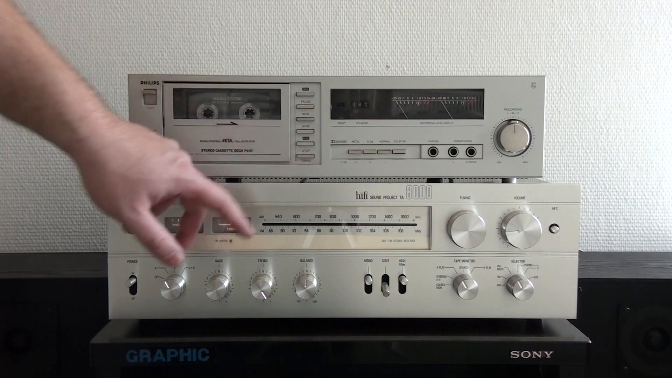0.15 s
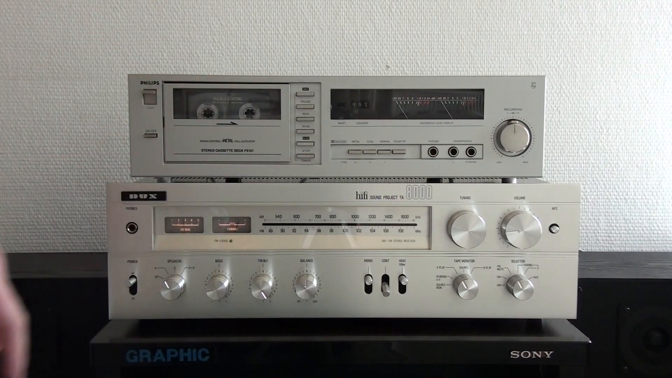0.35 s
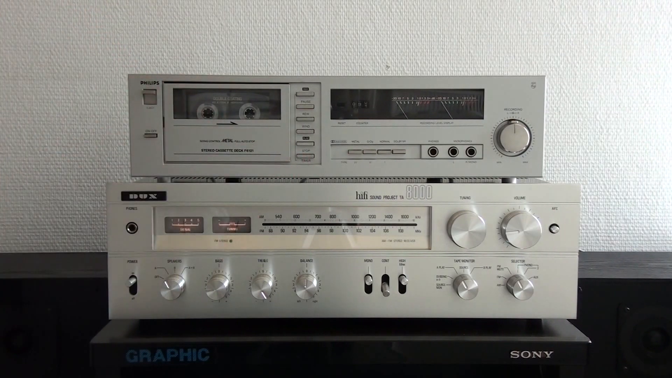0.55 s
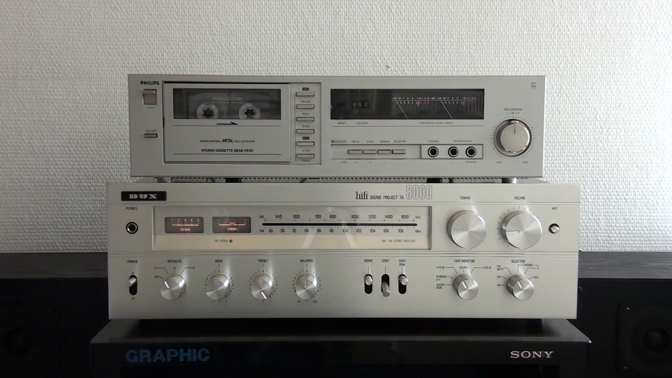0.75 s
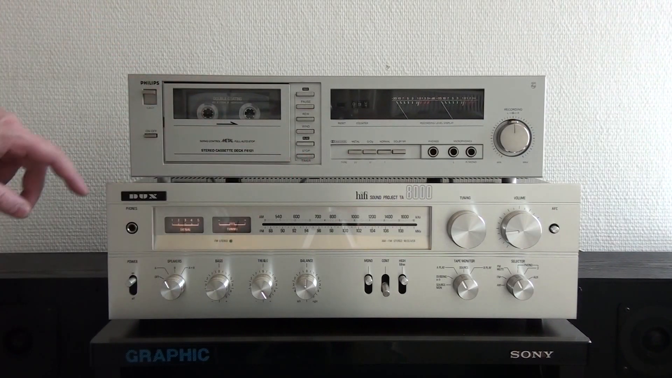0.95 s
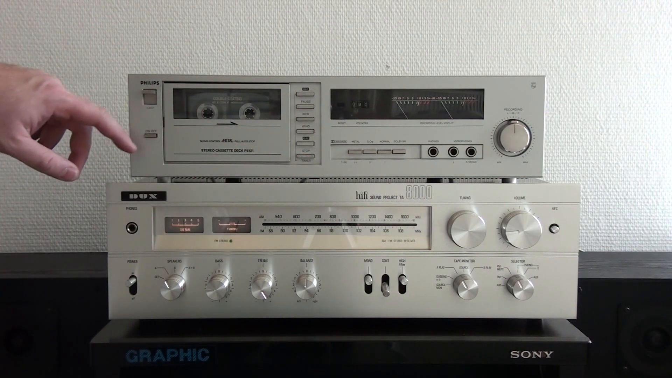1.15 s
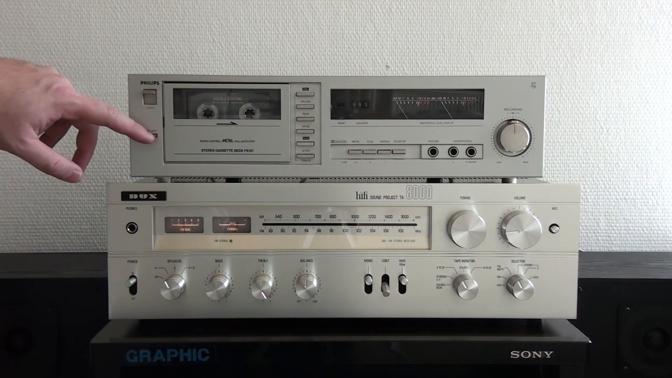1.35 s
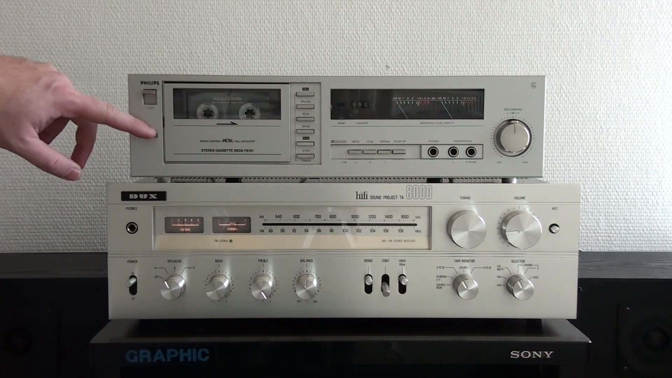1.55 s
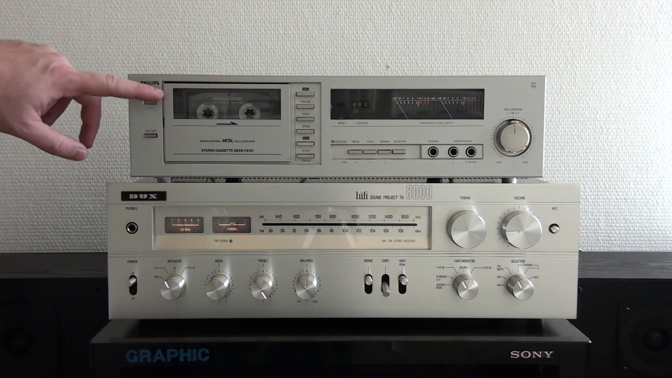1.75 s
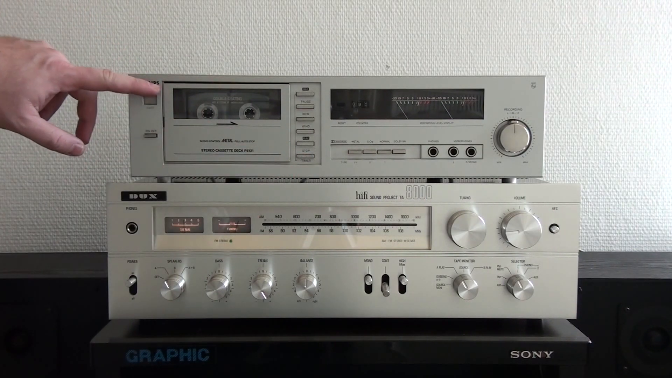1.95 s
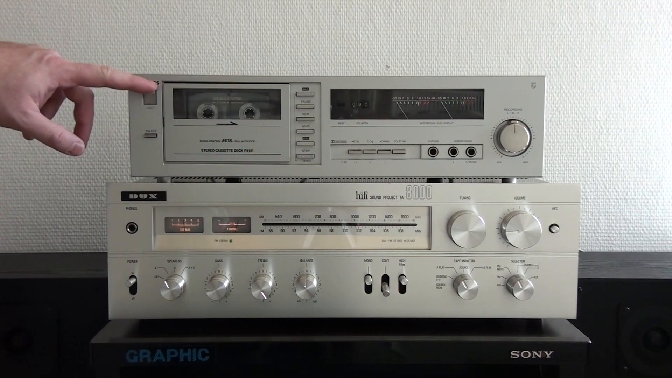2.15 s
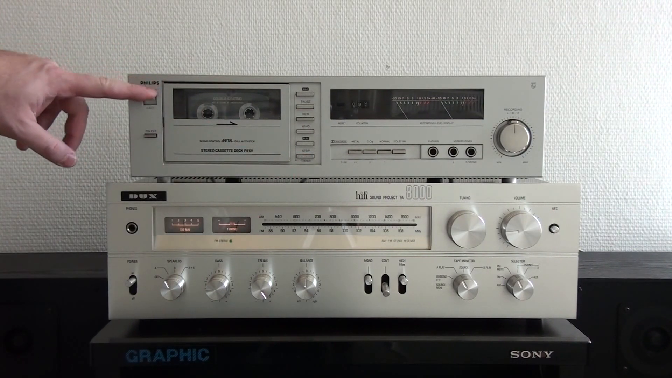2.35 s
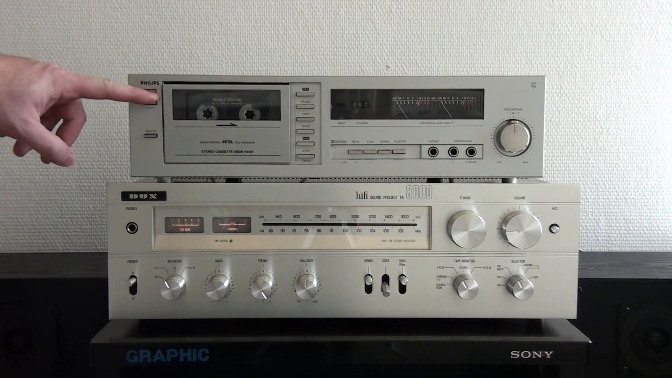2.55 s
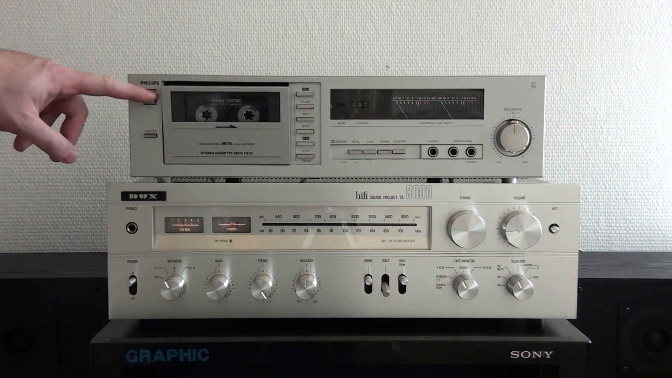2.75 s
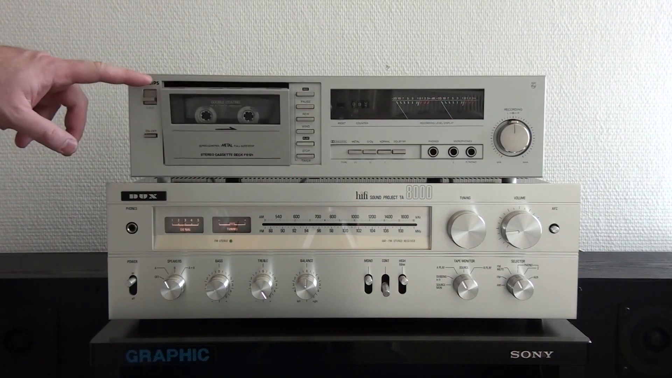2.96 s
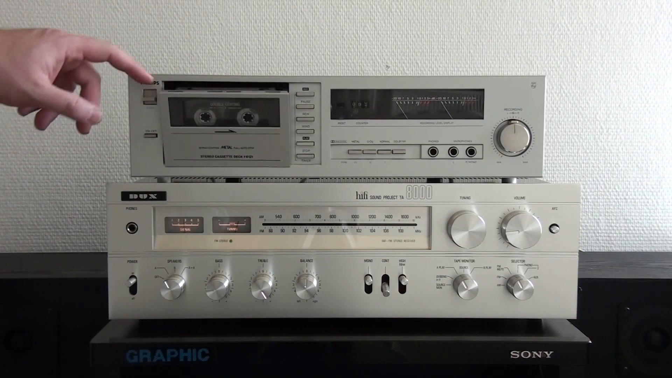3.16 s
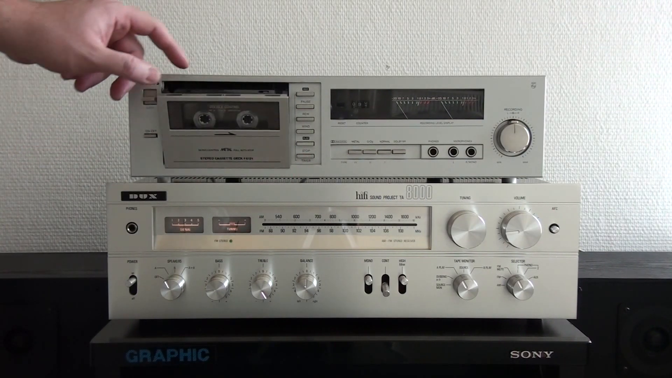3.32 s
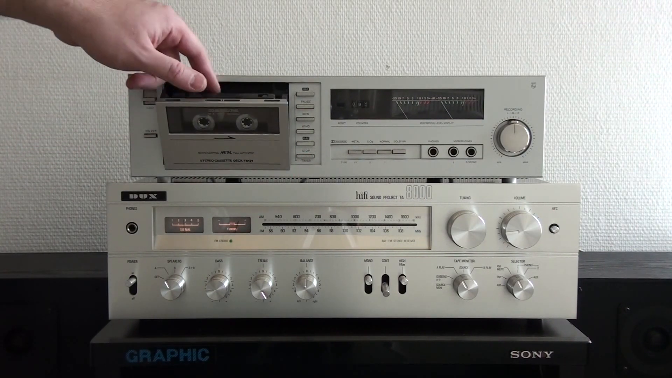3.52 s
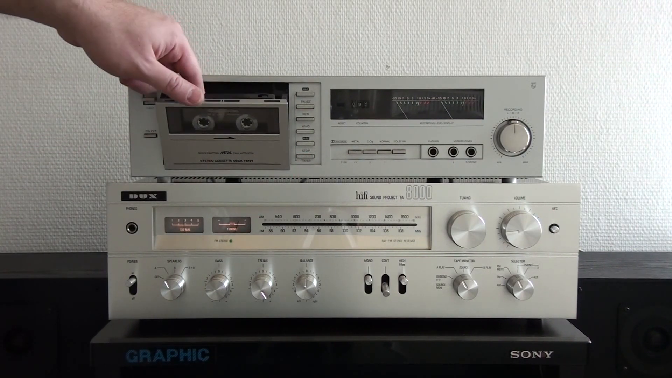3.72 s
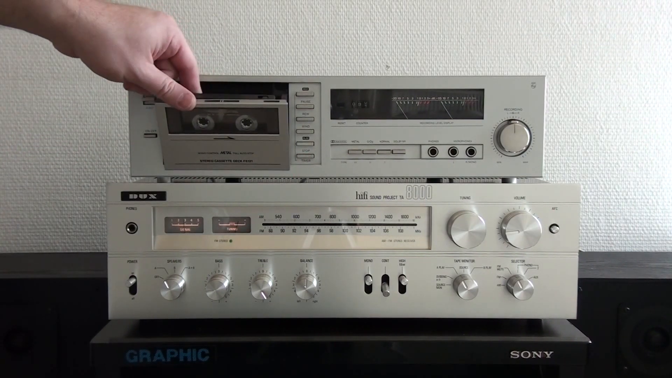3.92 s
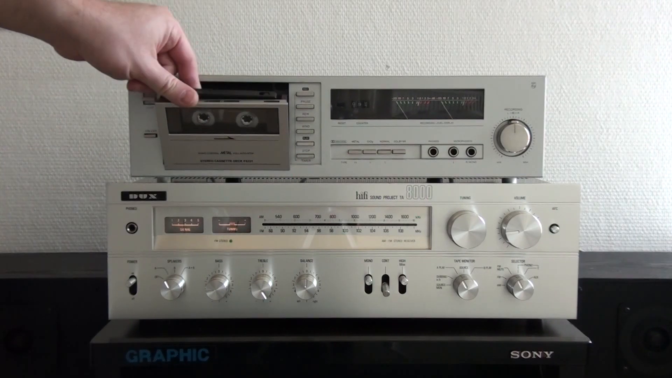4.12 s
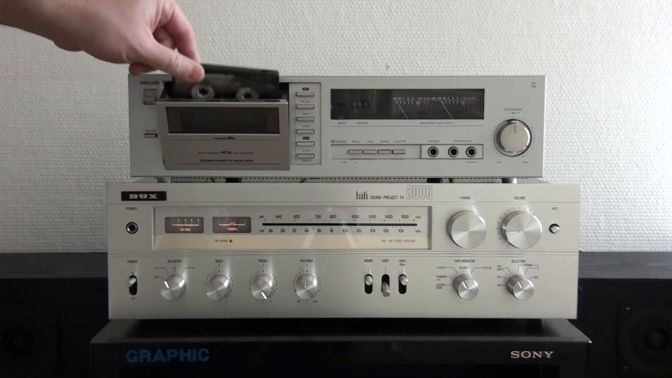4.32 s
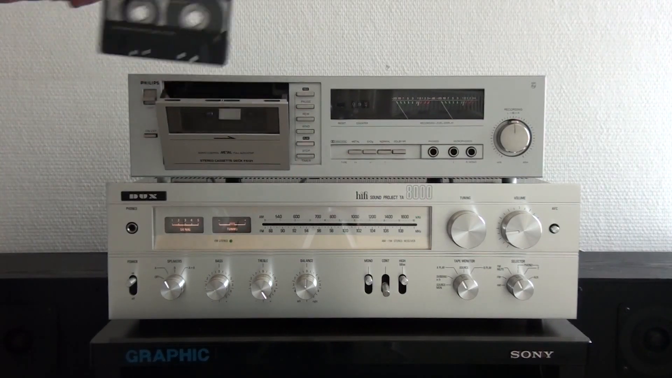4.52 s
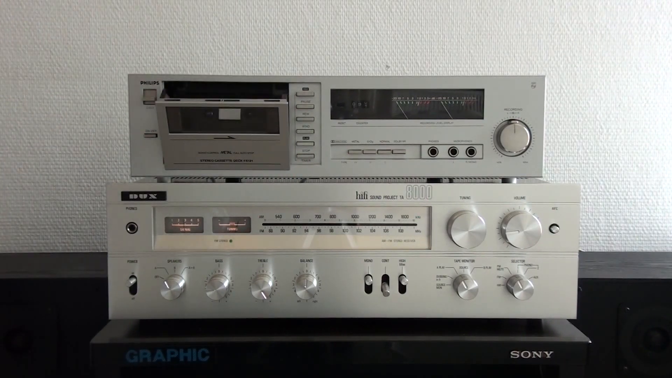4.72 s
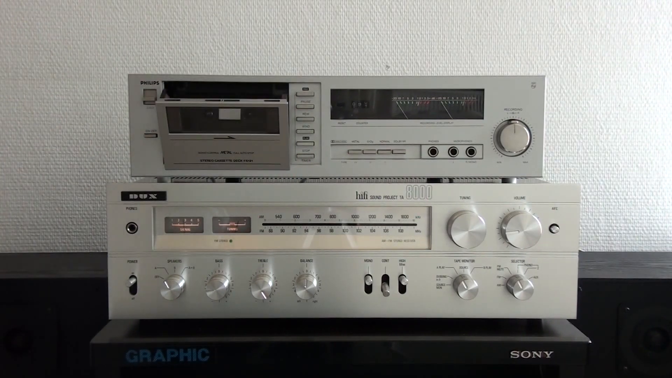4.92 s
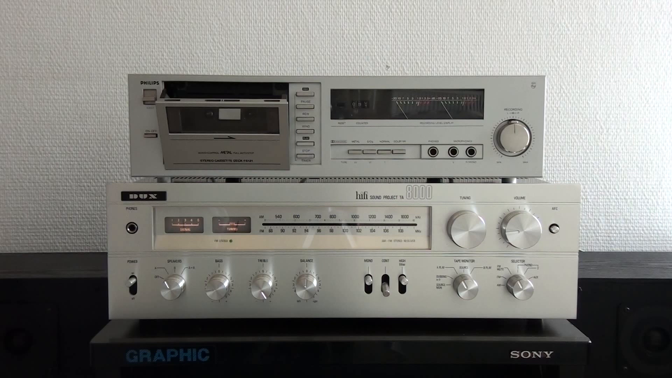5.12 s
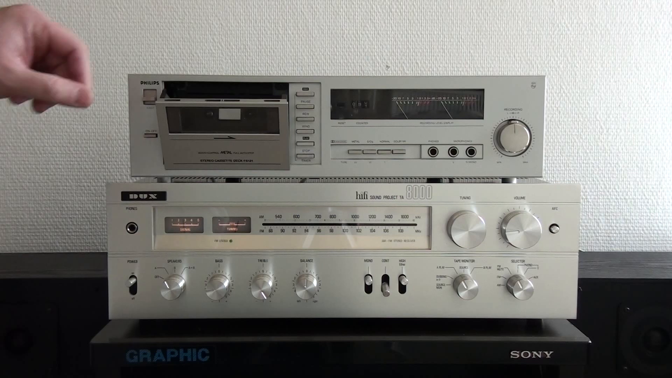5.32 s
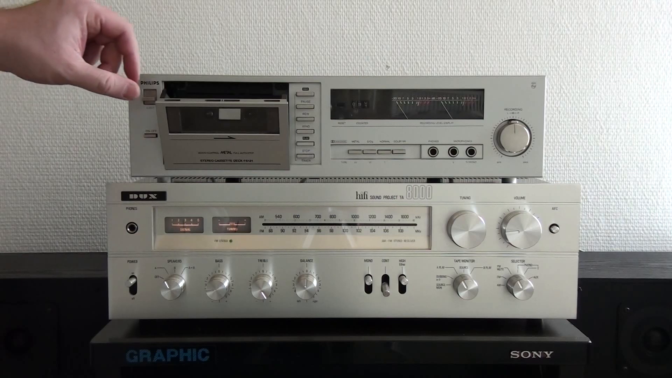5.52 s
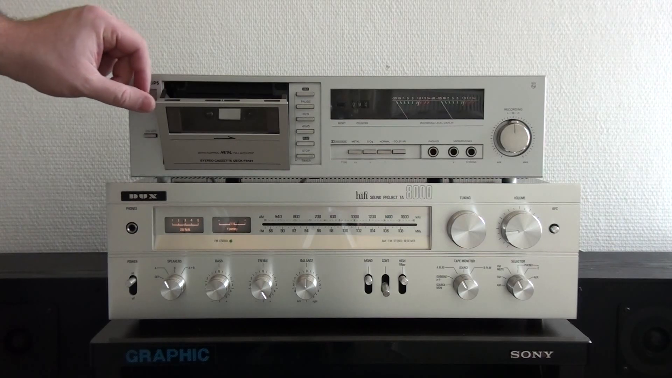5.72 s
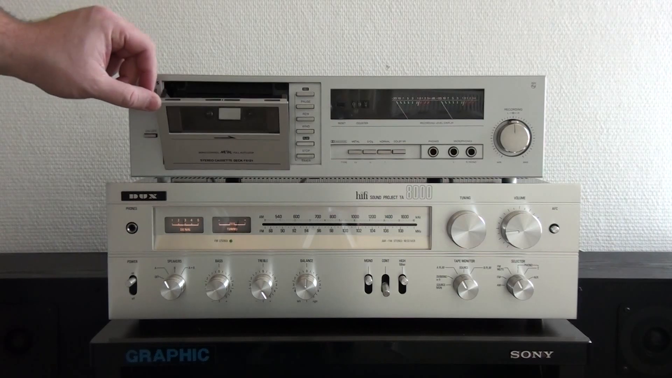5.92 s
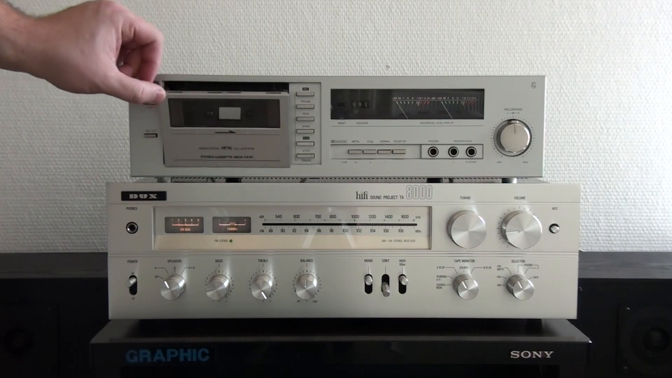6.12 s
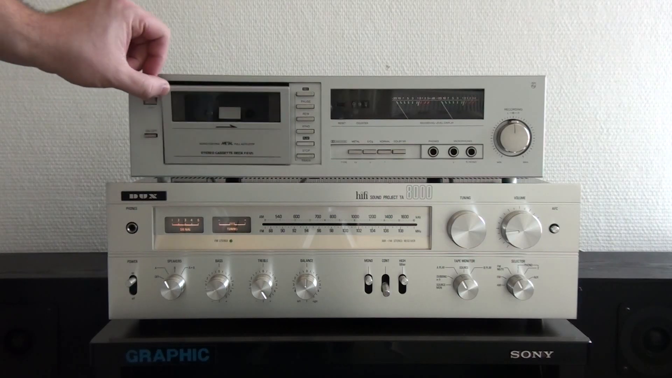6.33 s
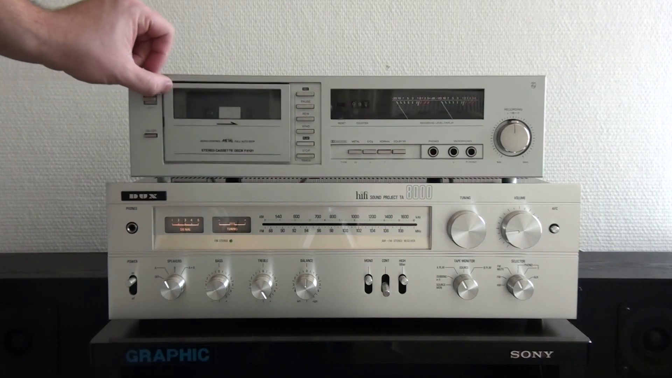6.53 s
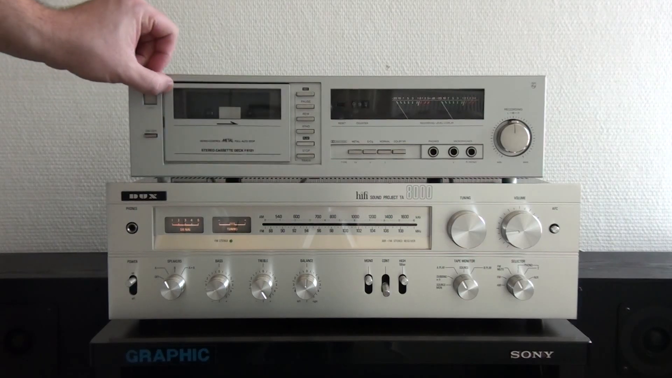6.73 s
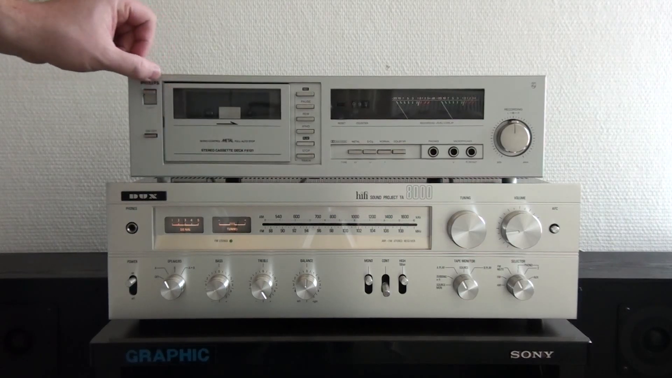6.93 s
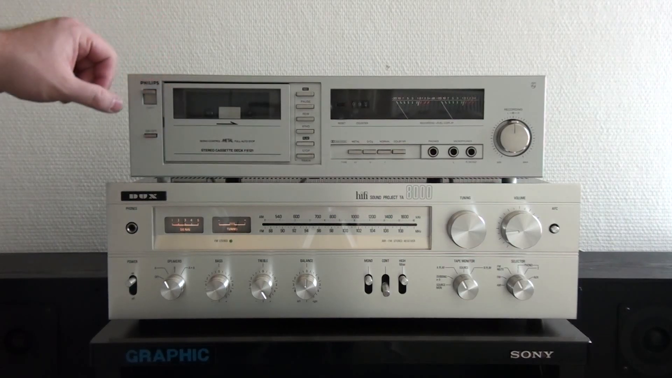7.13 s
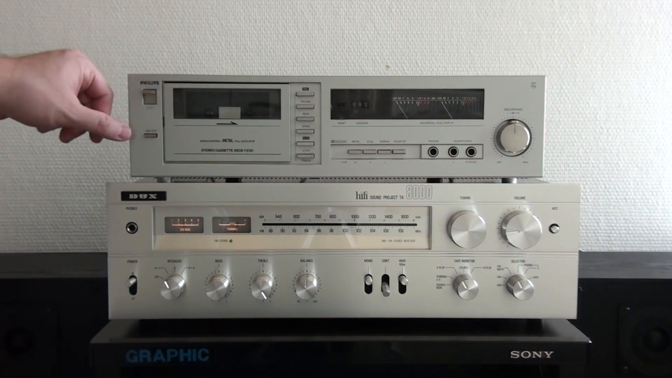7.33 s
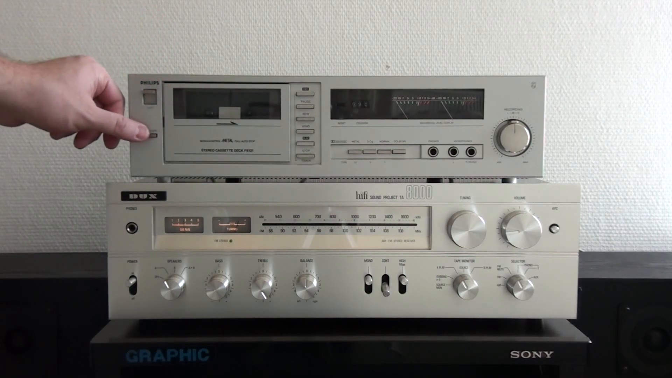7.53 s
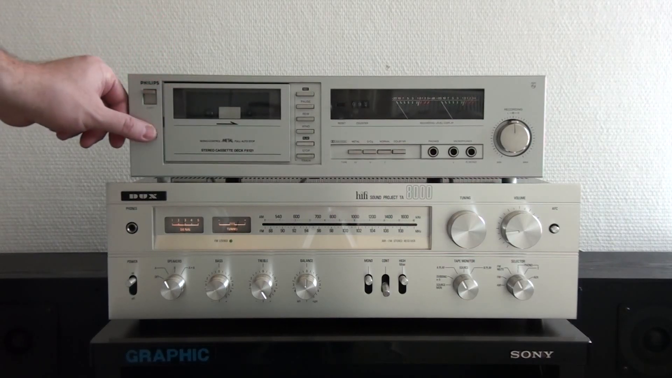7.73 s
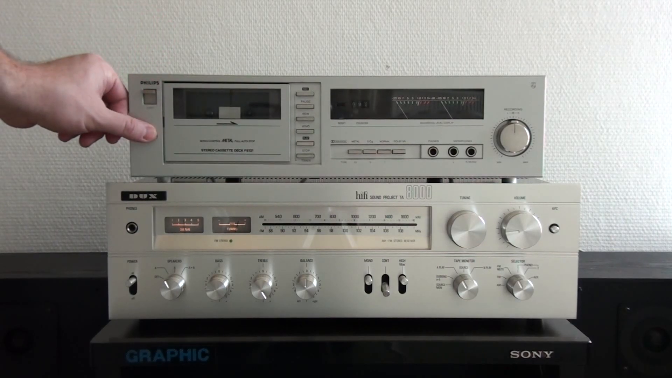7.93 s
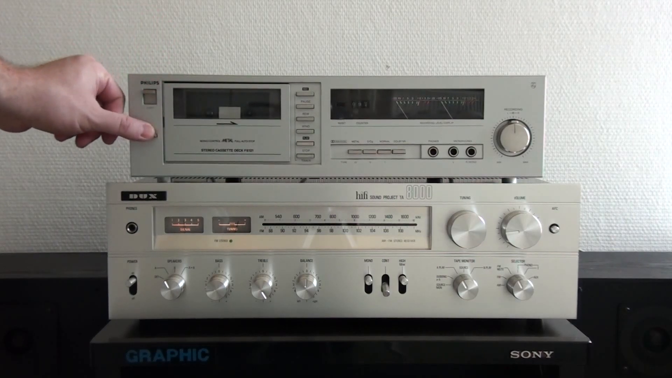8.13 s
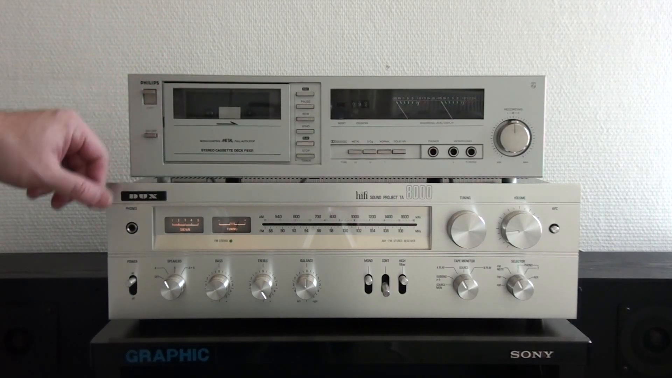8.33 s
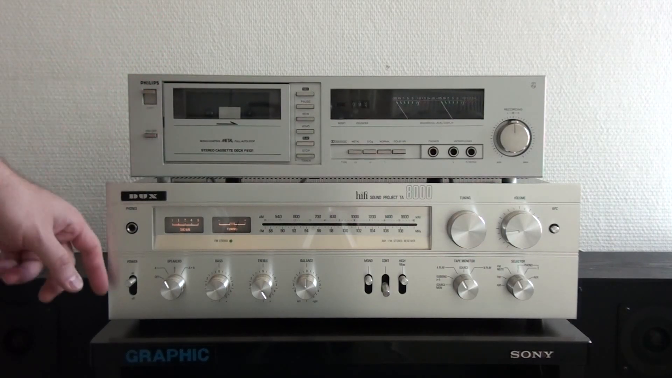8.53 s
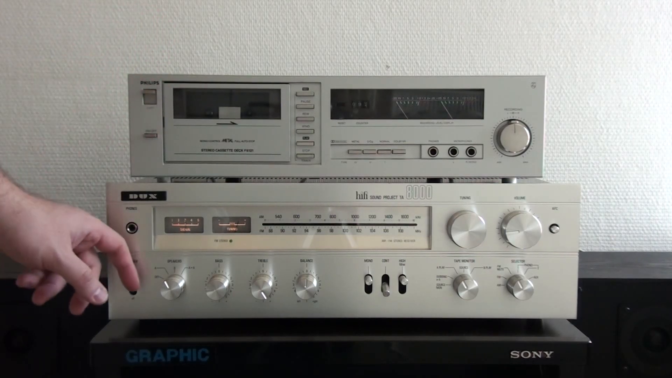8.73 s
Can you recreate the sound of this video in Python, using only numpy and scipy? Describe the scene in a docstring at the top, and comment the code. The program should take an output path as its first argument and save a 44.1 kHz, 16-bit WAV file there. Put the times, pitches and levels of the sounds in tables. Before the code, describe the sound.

Mechanical clacks of a tape deck opening, a cassette pulled out and set down, a loud metallic latch snap, then small switch clicks.

```python
"""Clacks, a scrape, a steel snap and small clicks from a cassette deck in a quiet, small room.
The eject key clacks, the door swings open, the cassette scrapes out and is set down to the left;
the door is pushed shut until its latch snaps, then the power button clicks in and out.
Each blow is a burst of contact chatter ringing damped modes; the scrape is stick-slip impulses.
Noise-built reflections carry the blows on, over still air, a low drone, a thin whine and an early rustle."""
import sys
import numpy as np
from scipy import signal
from scipy.fft import rfft, irfft
from scipy.io import wavfile
from scipy.ndimage import uniform_filter1d

SR = 44100
rng = np.random.default_rng(int(sys.argv[2]) if len(sys.argv) > 2 else 0)


def log_audio(samples):
    """Write samples as a 16-bit WAV file to the path given in sys.argv[1]."""
    # one column per channel
    frames = np.atleast_2d(samples).T
    # limit to full scale, then quantise
    limited = np.clip(frames, -1, 1)
    pcm = np.round(limited * 32767).astype(np.int16)
    wavfile.write(sys.argv[1], SR, pcm)


N = 391166
T = np.arange(N) / SR
SIZE = 32768  # samples in one blow or room response
BLOW_T = np.arange(SIZE) / SR
HZ = np.maximum(np.fft.rfftfreq(SIZE, 1 / SR), 1)

# resonances of the deck's case and door: f/Hz, width/Hz, level/dB
CASE_MODES = [(220, 50, -2), (500, 50, -6), (880, 130, -4), (1450, 320, -5), (2600, 200, -3)]
# radiation of a sharp blow by the deck: f/Hz, level/dB
DECK_COLOUR = [(25, -33), (85, -5), (125, -11.5), (170, 1.5), (400, 2), (730, -6), (1900, 1.5),
               (3400, -4.5), (5200, -3.5), (9000, -3), (12000, 0), (15500, -14)]
# radiation of a sharp blow by the small power parts, almost no deep bass: f/Hz, level/dB
POWER_COLOUR = [(25, -38), (150, -7), (350, 0), (730, -2.5), (1900, -1), (5200, -1.5), (9000, -2.5),
                (12500, -2.5), (15500, -15)]


def undb(db):
    """Decibels to amplitude gain."""
    return 10 ** (np.asarray(db) / 20)


def colour(points, hz):
    """Gain at each frequency from (f/Hz, level/dB) points, linear in dB over log frequency."""
    f, db = np.transpose(points)
    return undb(np.interp(np.log(np.maximum(hz, 1)), np.log(f), db))


def causal(gain):
    """Minimum-phase response with this gain, by folding the cepstrum: all of it follows the blow."""
    cepstrum = irfft(np.log(gain))
    cepstrum[1:SIZE // 2] *= 2
    cepstrum[SIZE // 2 + 1:] = 0
    return np.exp(rfft(cepstrum))


def resonances(modes, hz):
    """Summed response of damped modes (f/Hz, width/Hz, level/dB)."""
    total = 0
    for f, width, db in modes:
        detuning = (hz * hz - f * f) / (np.maximum(hz, 1) * width)
        total = total + undb(db) / (1 + 1j * detuning)
    return total


def contact(fade_s):
    """Two rough faces meeting: a tiny burst of chatter, its smoothed spectrum levelled to unit gain."""
    burst = rfft(rng.standard_normal(SIZE) * BLOW_T * np.exp(-BLOW_T / fade_s))
    smooth_power = uniform_filter1d(np.abs(burst) ** 2, size=330)
    delay = np.exp(-2j * np.pi * HZ * 16 / SR)  # 16 samples
    return burst / np.sqrt(smooth_power) * delay


def add(track, s, response):
    """Lay a blow, given as a frequency response, into the track at s seconds."""
    start = int(s * SR)
    sound = irfft(response)[:min(SIZE // 2, N - start)]
    track[start:start + len(sound)] += sound


def tinted(x, gain):
    """Filter by a gain on the frequency axis; rms 1."""
    y = irfft(rfft(x) * gain, N)
    return y / y.std()


def train(start_s, gap_s, db, loss_db, count):
    """Rebounds as (t/s, strength/dB): evenly spaced, each weaker than the last."""
    return [(start_s + k * gap_s, db - k * loss_db) for k in range(count)]


def small_room(x, direct_db, wet_db, pan_db, side_db, build_s):
    """Direct sound, then dense reflections that build up within milliseconds; the bass comes late and stays."""
    # reverberation time: f/Hz, T60/s
    room_t60 = [(150, 0.54), (900, 0.38), (4500, 0.36), (12000, 0.26)]
    knots_hz, knots_t60 = np.transpose(room_t60)
    centres_hz = 125 * 2. ** np.arange(8)
    tail = 0
    for k, hz in enumerate(centres_hz):
        t60_s = np.interp(np.log(hz), np.log(knots_hz), knots_t60)
        build_up = (1 - np.exp(-BLOW_T / (build_s * (1 + 450 / hz)))) ** 2
        power = build_up * np.exp(-np.log(1e6) * BLOW_T / t60_s)
        # the early reflections are dense and grainy, uneven in strength, smoothing out later
        grain = undb(5 * np.exp(-BLOW_T / .04) * rng.standard_normal(SIZE))
        grain = grain / np.sqrt(uniform_filter1d(grain ** 2, size=400))
        noise = rng.standard_normal((2, SIZE)) * grain
        band = np.sqrt(np.interp(np.log(HZ), np.log(centres_hz), np.arange(8) == k))
        tail = tail + rfft(noise * np.sqrt(power / power.sum())) * band
    # the two microphones are close together and hear the bass alike
    mid = irfft(tail[0])
    side = irfft(tail[1] * undb(side_db) * HZ / np.hypot(HZ, 380))
    balance = undb(np.array([[.2], [-.2]]))
    response = undb(wet_db) * np.array([mid + side, mid - side]) * balance
    direct = x[0] * undb(direct_db + np.array([[pan_db], [-pan_db]]) / 2)
    return direct + signal.fftconvolve(x[1:], response, axes=1)[:, :N]


def plastic(blows, modes, radiation, fade_s, facing_db):
    """Blows ring the part struck, duller for longer contact; rows: towards the microphone, into the room."""
    softness_db_per_oct = 10.5  # fade above the frequency that the contact time allows
    panel_ms = 0.205  # a contact this long moves the whole front panel
    tracks = np.zeros((2, N))
    body = (1 + resonances(modes, HZ)) * causal(colour(radiation, HZ))
    # weight behind a blow, where given, moves the whole case and shifts the low end
    heavy = np.interp(np.log(HZ), np.log([230, 1900]), [1, 0])
    for s, db, contact_ms, *weight_db in blows:
        octaves_over = np.log2(1 + (2 * HZ * contact_ms / 1000) ** 4) / 4
        push = undb(db + sum(weight_db) * heavy - softness_db_per_oct * octaves_over)
        blow = causal(push) * body * contact(fade_s)
        # facing panel: middle range shifted by up to facing_db
        lift_db = facing_db * min(contact_ms / panel_ms, 1)
        beam = colour([(300, 0), (1200, lift_db), (2200, lift_db), (5000, -2.5)], HZ)
        add(tracks[0], s, blow * causal(beam))
        add(tracks[1], s, blow)
    return tracks


def ambience(air_db, side_db, drone_db, whine_db, rustle_db):
    """Still air and hiss, a low wavering drone, a thin whine, and the arm's soft rustle as it draws back."""
    # still air of the room and microphone hiss: f/Hz, relative density/dB per Hz
    air_colour = [(20, -18.5), (50, -13), (75, -15.5), (130, -16), (190, -10), (270, -9.5), (320, -15),
                  (420, -12), (600, -15.5), (1020, -14), (2200, -19.5), (5000, -25), (11000, -25.5),
                  (12000, -23), (15500, -29.5)]
    hz = np.fft.rfftfreq(N, 1 / SR)
    noise = rng.standard_normal((4, N))
    air_gain = colour(air_colour, hz)
    air = tinted(noise[0], air_gain) * undb(air_db)
    spread = colour([(100, -12), (300, -1.0), (900, 4.5), (5000, 2.5), (11000, -3.5), (12500, -22.5)], hz)
    side = tinted(noise[1], air_gain * spread) * undb(side_db)
    drone = tinted(noise[2], resonances([(228.5, 47, 0)], hz) ** 2) * undb(drone_db)
    whine = np.sin(2 * np.pi * 1681 * T) * undb(whine_db)
    rustle = tinted(noise[3], colour([(100, -26), (400, -12), (1200, -14.5), (5000, -23), (15000, -26)], hz))
    rustle *= undb(rustle_db) * np.interp(T, [0, .42, .7], [1, .8, 0])
    return air + drone + whine + rustle + side * np.array([[1], [-1]])


def fingertips():
    """Fingers land on the deck: light touches are all thump, firm ones stiffen, shorten and also click."""
    # fingertips landing on the deck and pressing the door: t/s, strength/dB
    touches = [(2.094, -25.5), (2.176, -32), (3.535, -24), (5.97, -21), (6.493, -18), (6.541, -19.5),
               (6.577, -12), (8.37, -32.5), (8.68, -19.5), (8.71, -24)]
    # contact time at the reference strength; it halves every halving_db
    reference_ms, reference_db, halving_db = .24, -20.5, 8.5
    thump_db = -18  # the hand thumps the case alike however lightly the finger lands
    blows = []
    for s, db in touches:
        contact_ms = reference_ms * 2 ** ((reference_db - db) / halving_db)
        blows.append((s, db, contact_ms, thump_db - db))
    return plastic(blows, CASE_MODES, DECK_COLOUR, fade_s=0.0013, facing_db=-1.0)


def power_switch():
    """The sprung catch of the power switch engages and lets go, ringing switch and spring."""
    # catch clicks: t/s, strength/dB, contact time/ms
    clicks = [(7.904, -12, 0.041), (8.096, -16.5, 0.068)]
    # switch and spring: f/Hz, width/Hz, level/dB
    modes = [(446, 60, -3), (2580, 99, 8), (4500, 70, -3), (6400, 80, -1)]
    return plastic(clicks, modes, POWER_COLOUR, fade_s=0.0008, facing_db=0)


def power_button():
    """The power button springs back against its stop and rings the panel around it."""
    # return blow: t/s, strength/dB, contact time/ms
    returns = [(8.124, -11, 0.035)]
    # button and panel: f/Hz, width/Hz, level/dB
    modes = [(506, 150, 6.5), (740, 90, 8), (1270, 90, 3), (2370, 130, 2), (11700, 900, -1)]
    return plastic(returns, modes, POWER_COLOUR, fade_s=0.00075, facing_db=0)


def setting_down():
    """The cassette touches down on the furniture; its light shell rings with little bass."""
    # touchdowns: t/s, strength/dB, contact time/ms
    touchdowns = [(4.8606, -22, 0.09), (4.9156, -6.5, 0.069), (4.9566, -14, 0.08), (5.0356, -8.5, 0.028),
                  (5.0436, -1.5, 0.2)]
    # cassette shell: f/Hz, width/Hz, level/dB
    modes = [(560, 120, -7), (780, 120, -9), (1280, 260, -5), (1930, 120, -8), (2670, 240, -1),
             (7300, 700, -2)]
    # radiation of a sharp blow by the shell: f/Hz, level/dB
    radiation = [(25, -52), (230, -27), (730, 1.5), (1900, -2.5), (5200, -7.5), (11000, -3), (15500, -22)]
    return plastic(touchdowns, modes, radiation, fade_s=0.0012, facing_db=2.0)


def eject():
    """The eject key works its linkage and the door swings to its stop, ringing case and door."""
    # key, linkage and door blows: t/s, strength/dB, contact time/ms, weight behind the blow/dB
    blows = [(2.266, -22, 0.13, -1), (2.337, -15, 0.019, -2), (2.38, -9, .06, -2),
             (2.427, -13, 0.034, 10.5), (2.486, -5.5, 0.16, 3.5), (2.602, -17, 0.39, 2),
             (2.643, -17, 0.33, -3), (2.742, -16, 0.1, -1), (2.79, -19, 0.11, 13), (2.849, -25.5, .04, 7)]
    return plastic(blows, CASE_MODES, DECK_COLOUR, fade_s=0.001, facing_db=6)


def lifting_out():
    """The cassette knocks in its holder as it is lifted out; the loaded holder rings."""
    # knocks: t/s, strength/dB, contact time/ms
    knocks = [(3.78, -21, 0.35), (3.839, -10, 0.26), (3.904, -13.5, .32), (4.161, -22, 0.31),
              (4.343, -10, .4), (4.366, -16, .06), (4.375, -5.5, .03), (4.392, 7, 0.035),
              (4.403, -3.5, 0.14), (4.422, -7, 0.24), (4.532, -16, 0.065)]
    # holder with the cassette in it: f/Hz, width/Hz, level/dB
    modes = [(235, 60, -1), (500, 70, 0), (1400, 320, 3), (2650, 160, -1)]
    # radiation of a sharp blow by the holder: f/Hz, level/dB
    radiation = [(25, -42), (85, -12.5), (140, -11.5), (200, -3.5), (450, -3.5), (730, -5), (1800, 0),
                 (3400, -2), (6000, 1.5), (12500, 0), (15500, -15)]
    return plastic(knocks, modes, radiation, fade_s=0.00092, facing_db=6.5)


def drag(slips_per_s, scatter_db, patchy_db):
    """The shell sticks and slips on the guides in uneven rubs, hollow in colour, swelling until it comes free."""
    # scrape on the guides: f/Hz, level/dB
    guide_colour = [(25, -60), (100, -38), (350, -14), (500, -6), (650, -14), (950, -6), (1250, 1),
                    (1480, 1), (1850, -11), (2700, -14), (4000, -24), (8000, -24), (13000, -33)]
    start_s, fast_s, free_s = 4.11, 4.3626, 4.39
    creep_db, fast_db, swell_db_per_s = -65.5, -32, 275  # levels ahead of the room
    slips = (rng.random(N) < slips_per_s / SR) * undb(scatter_db * rng.standard_normal(N))
    rubs = uniform_filter1d(rng.standard_normal(N), size=800)
    slips = (slips - slips.mean()) * undb(patchy_db * rubs / rubs.std())
    scrape = signal.fftconvolve(slips, irfft(causal(colour(guide_colour, HZ))))[:N]
    speed_db = np.clip(fast_db + swell_db_per_s * (T - fast_s), creep_db, fast_db)
    pulling = (T > start_s) * (T < free_s)
    return scrape / scrape.std() * undb(speed_db) * pulling


def latch(mode_width_hz, modes_db, chatter_s):
    """The sprung steel catch rides up, snaps and chatters while the door thuds and judders on the case."""
    # ringing modes of latch and spring: f/Hz, relative level/dB
    latch_modes = [(4355, 5.5), (4398, -11), (4533, -7), (4570, 4.5), (4717, -2), (4992, 1.5), (5609, -4.5),
                   (6190, 4.5), (6607, -3), (6681, -0.5), (7208, -13.5), (9335, 15.5), (10131, -6.5),
                   (10295, 12.5)]
    # colour of the steel: f/Hz, level/dB
    steel_colour = [(100, -49.5), (700, -12.5), (1500, -6), (3000, -7), (4500, 1), (5600, -2), (6800, 1.5),
                    (8000, -5), (10200, -2.5), (11000, -7.5), (12500, -8), (15500, -22)]
    # colour of the door thud: f/Hz, level/dB
    thud_colour = [(35, -39), (70, -14.5), (115, -18), (175, -6.5), (250, -0.5), (400, -4), (620, -14.5),
                   (920, -5), (2000, -15), (6000, -18)]
    snap_s, snap_db, catch_lead_s, catch_db = 6.612, 14, .005, 1.5
    bounce_gap_s, door_lag_s = .0092, .009
    track = np.zeros(N)
    modes = [(f, mode_width_hz, db) for f, db in latch_modes]
    steel = causal(colour(steel_colour, HZ)) * (1 + undb(modes_db) * resonances(modes, HZ))
    thud = causal(colour(thud_colour, HZ)) * (1 + resonances(CASE_MODES, HZ))
    bounces = train(snap_s + bounce_gap_s, bounce_gap_s, db=9.5, loss_db=.2, count=5)
    for s, db in [(snap_s - catch_lead_s, catch_db), (snap_s, snap_db), *bounces]:
        add(track, s, undb(db) * steel * contact(chatter_s))
    for s, db in train(snap_s + door_lag_s, gap_s=.013, db=6.5, loss_db=.2, count=3):
        add(track, s, undb(db) * thud * contact(chatter_s))
    return track


def scene():
    """The deck stands straight ahead; the cassette is put down off to the left."""
    background = ambience(air_db=-66.86, side_db=-68, drone_db=-75.5, whine_db=-84.0, rustle_db=-69)
    deck = fingertips() + power_switch() + power_button() + eject() + lifting_out()
    # scrape and latch reach microphone and room alike
    deck += drag(slips_per_s=800, scatter_db=2, patchy_db=5)
    deck += latch(mode_width_hz=15, modes_db=-6.5, chatter_s=.001)
    ahead = small_room(deck, direct_db=-6.5, wet_db=-1.0, pan_db=0.5, side_db=-11.0, build_s=0.0021)
    left = small_room(setting_down(), direct_db=-6.04, wet_db=-3.54, pan_db=7.5, side_db=-9.0, build_s=0.0025)
    return ahead + left + background


def record(dry):
    """Soft saturation rounds the loudest peaks; an elliptic low-pass cuts the top steeply."""
    top_hz = 15850
    rounded = np.tanh(1.5 * dry) / 1.5
    low_pass = signal.ellip(12, .2, 80, top_hz, fs=SR, output="sos")
    return signal.sosfilt(low_pass, rounded)


dry = scene()
out = record(dry)
log_audio(out)
```